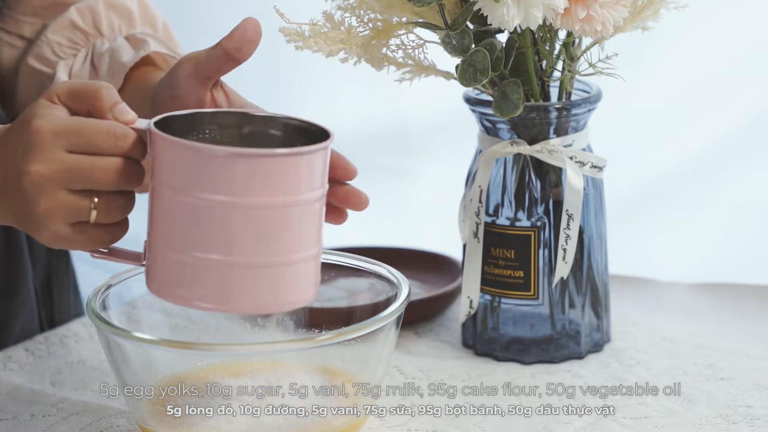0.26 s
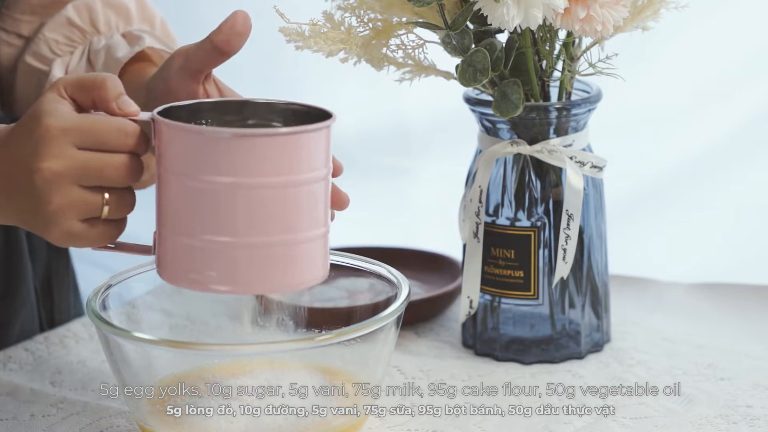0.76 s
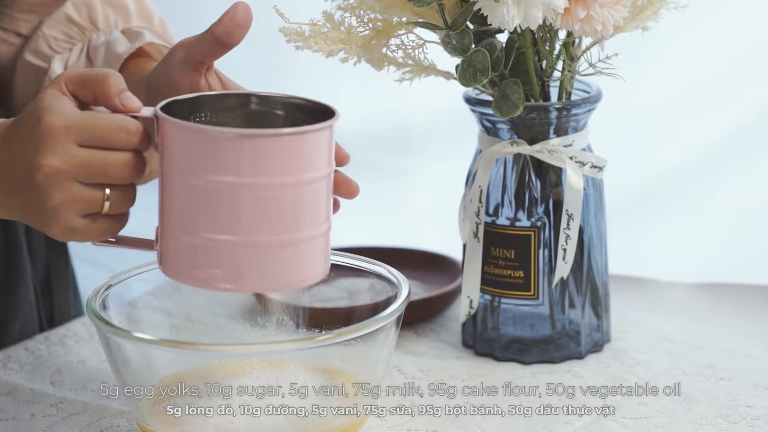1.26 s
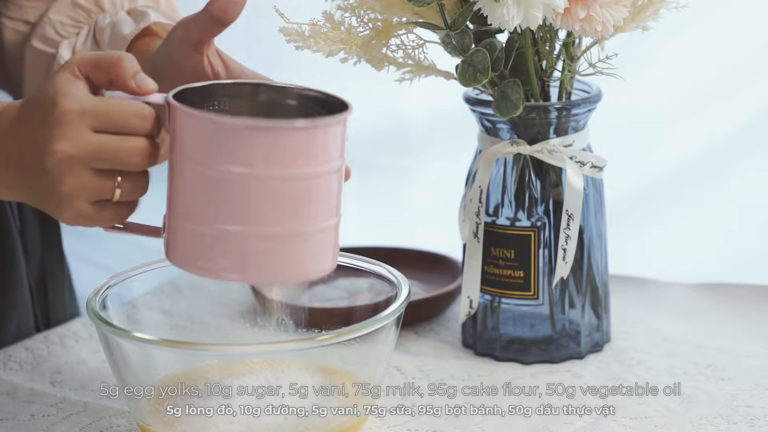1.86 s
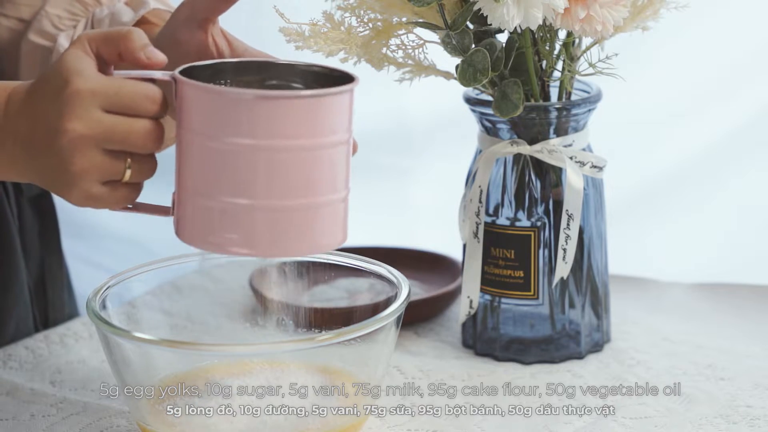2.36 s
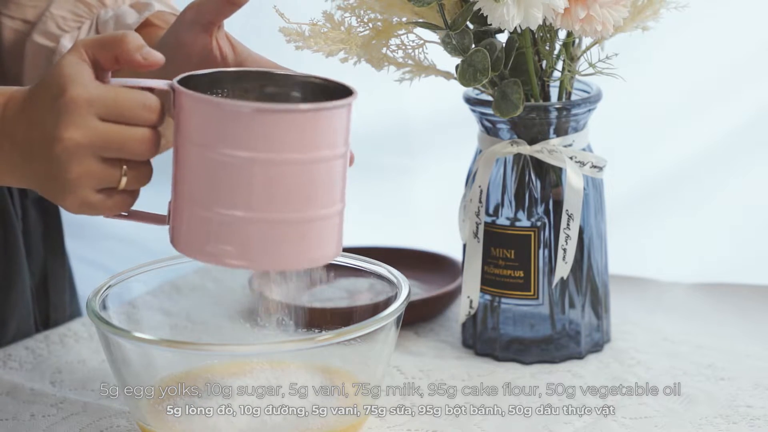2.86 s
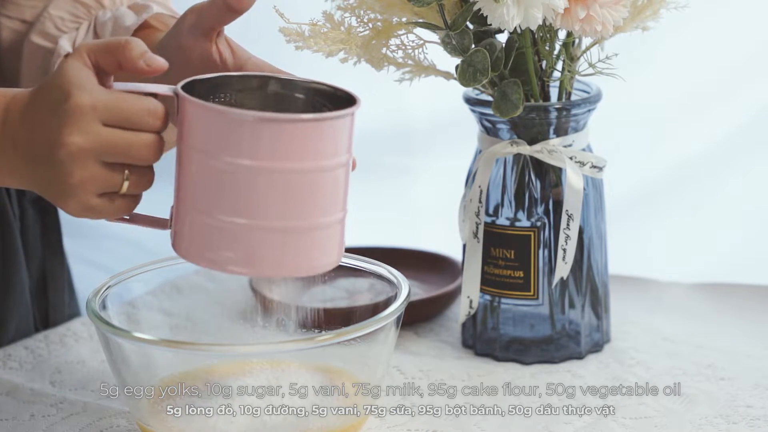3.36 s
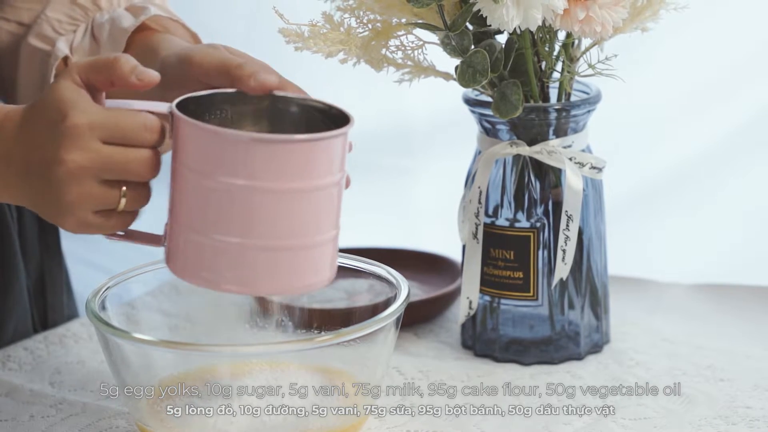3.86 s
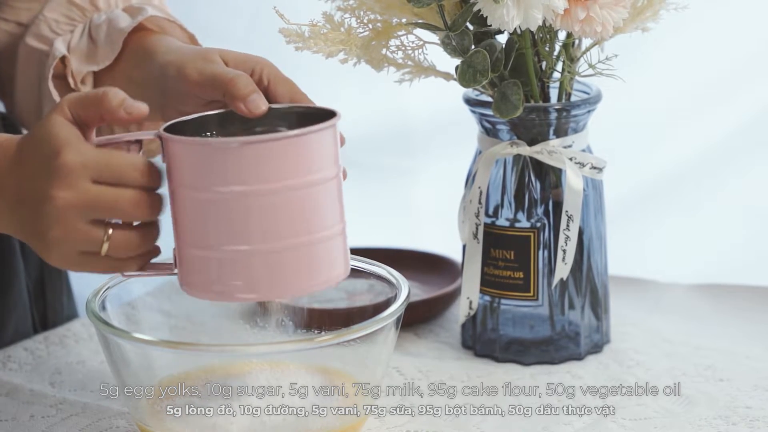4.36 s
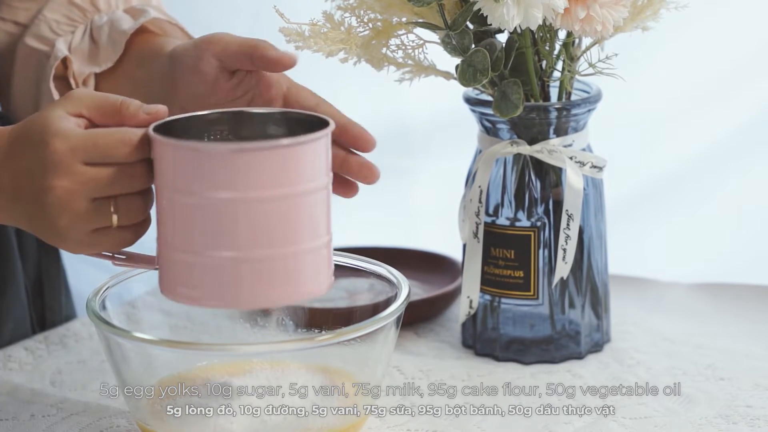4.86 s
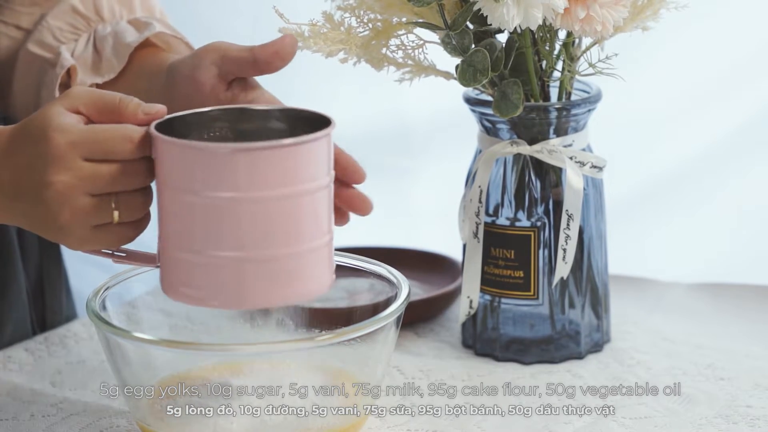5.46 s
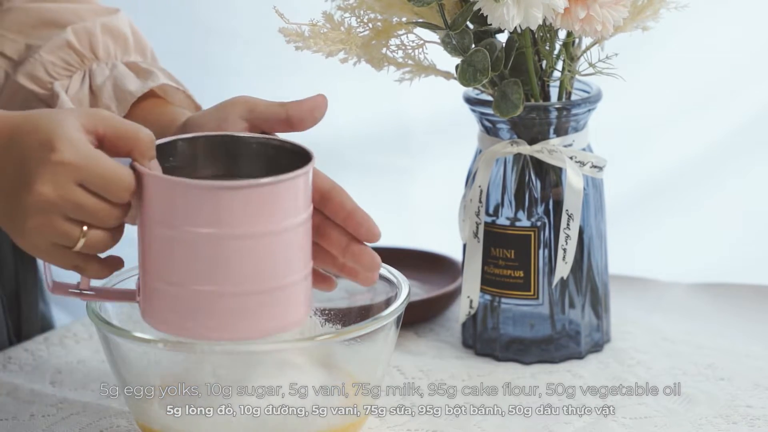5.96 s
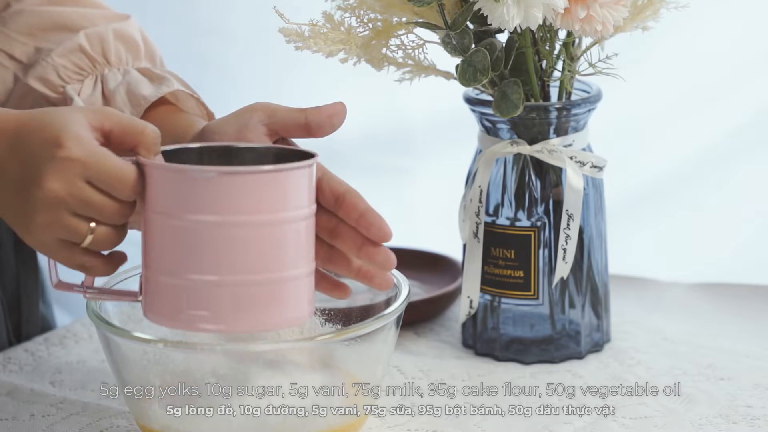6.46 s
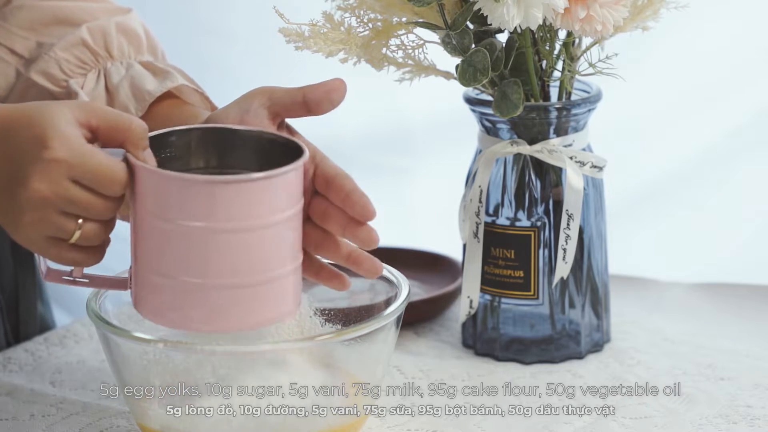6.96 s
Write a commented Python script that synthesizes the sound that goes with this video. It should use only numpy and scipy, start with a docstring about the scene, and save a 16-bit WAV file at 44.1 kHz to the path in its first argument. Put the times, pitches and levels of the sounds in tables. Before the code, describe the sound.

A metal flour sifter clicks and rasps in quick strokes, then is patted softly and clinks once against a glass bowl.

```python
"""A quiet kitchen, one microphone close to a squeeze-handle tin flour sifter.
A low hum wavers over soft hiss throughout, and a hand first shifts the can lightly. From 0.6 to 4.7 s each
stroke drags the wire agitator over the mesh: a gritty rub, sharp clicks that ring the can, and now and
then a faint ring from the handle spring. From 5 s the hand pats the can, which comes to rest tilted on
the palm. At 6.6 s its rim touches a glass bowl; two soft pats follow."""
import sys
import numpy as np
from scipy import signal
from scipy.fft import rfft, irfft, next_fast_len
from scipy.io import wavfile
from scipy.ndimage import map_coordinates

SR = 44100
rng = np.random.default_rng(int(sys.argv[2]) if len(sys.argv) > 2 else 0)


def waveform_to_disk(signal):
    """Save audio, clipped to [-1, 1], as 16-bit WAV at the path in sys.argv[1]."""
    frames = np.transpose(np.atleast_2d(signal))
    scaled = np.clip(frames, -1, 1) * 32767
    samples = np.round(scaled).astype(np.int16)
    wavfile.write(sys.argv[1], SR, samples)


N = 317520
EVENT_SAMPLES = 4096  # length of one pat, sweep or click


def amp(db):
    """Decibels to gain."""
    return 10 ** (np.asarray(db) / 20)


def unit_rms(x):
    """The signal scaled to rms 1."""
    return x / np.std(x)


def over_frequency(points, hz):
    """Rows of (frequency_hz, value), interpolated on a log axis."""
    point_hz, values = np.transpose(points)
    return np.interp(np.log(hz + 1), np.log(point_hz + 1), values)


def over_time(rows):
    """Rows of (time_s, value) as one value per sample."""
    return np.interp(np.arange(N) / SR, *np.transpose(rows))


def wobble(rate_hz, count=N):
    """A smooth random curve with rate_hz knots a second."""
    knots = rng.standard_normal(int(count * rate_hz / SR) + 4)
    return map_coordinates(knots, [np.arange(count) * rate_hz / SR])


def filtered(x, response):
    """The signal shaped by a gain that depends on frequency."""
    size = next_fast_len(N + SR // 2)
    return irfft(rfft(x, size) * response(np.fft.rfftfreq(size, 1 / SR)), size)[..., :N]


def resonate(force, modes):
    """A force rings modes (pitch_hz, width_hz, level_db), each at a fresh strength; scaled to peak 1."""
    pitch, width, level_db = np.transpose(modes)[:, :, None]
    hz = np.fft.rfftfreq(EVENT_SAMPLES, 1 / SR)
    polarity = (-1) ** np.arange(len(pitch))[:, None]
    gain = amp(level_db + rng.normal(0, 1.5, level_db.shape)) * polarity
    response = np.sum(gain * 1j * hz * width / (pitch ** 2 - hz ** 2 + 1j * hz * width), axis=0)
    ring = irfft(rfft(force, EVENT_SAMPLES) * response, EVENT_SAMPLES)
    return ring / np.abs(ring).max()


def band(force, pitch_hz, *widths_hz):
    """One resonance, applied once for each width; a second pass steepens its sides."""
    for width_hz in widths_hz:
        force = resonate(force, [(pitch_hz, width_hz, 0)])
    return force


# Spectrum of the kitchen's background: frequency_hz, relative_db
ROOM_SPECTRUM = [(22, -19), (38, -11), (60, -15), (95, -13.5), (180, -26), (553, -39), (1380, -48.5),
                 (5000, -59.5), (16000, -70)]
# Faint high rustle at the microphone: time_s, level_db
RUSTLE_LEVELS = [(0, -80), (4.4, -85), (4.8, -94), (5.96, -80.5), (6, -74), (6.6, -80), (6.65, -92.5)]
def room_tone():
    """Distant rumble and hiss, with low peaks from the room's standing waves, under a flickering rustle."""
    def room_response(hz):
        standing_db = 4.5 * np.exp(-(hz / 150) ** 4) * np.cos(2 * np.pi * (hz - 91) / 21)
        return amp(over_frequency(ROOM_SPECTRUM, hz) + standing_db) * (hz > 18)

    air = unit_rms(filtered(rng.standard_normal(N), room_response))
    rustle = unit_rms(filtered(rng.standard_normal(N), lambda hz: (hz / 12000) ** 0.31))
    return amp(-50 + 0.27 * wobble(1.4)) * air + amp(over_time(RUSTLE_LEVELS) + 1.8 * wobble(25)) * rustle


# Low hum in the room: time_s, level_db
HUM_LEVELS = [(0.0, -53), (0.06, -47.5), (0.74, -44.5), (0.84, -53), (1.1, -43.5), (1.2, -46.5), (4.4, -46),
              (4.49, -36), (4.57, -58), (4.71, -35), (4.82, -43.5), (6.0, -49.5), (6.11, -35),
              (6.34, -27.5), (6.4, -42), (6.48, -29.5), (6.58, -55), (6.78, -37.5), (6.85, -42),
              (6.94, -31.5), (7.0, -54.5), (7.06, -43.5), (7.2, -47.5)]
def room_hum():
    """A low hum that swells, fades and wanders in pitch."""
    pitch_hz = 50 + 3.2 * wobble(11)
    level_db = over_time(HUM_LEVELS) + 2.7 * wobble(8)
    return np.sqrt(2) * amp(level_db) * np.sin(2 * np.pi * np.cumsum(pitch_hz) / SR)


# Modes of the tin wall, also rung by sweeps and clicks: pitch_hz, width_hz, level_db
WALL_MODES = [(2010, 240, 3.5), (2290, 415, 5.5), (2980, 570, -0.5), (3142, 450, 4), (2975, 1210, 1.5)]
# The flour-filled can hanging free: pitch_hz, width_hz, level_db
FULL_CAN_MODES = [(195, 410, 0.5), (388, 25, 5.5)]
# The emptier can tilted against the palm: pitch_hz, width_hz, level_db
RESTING_CAN_MODES = [(800, 540, 6.5), (1390, 820, -1)]
# Pats and small shifts of the can, close up: start_s, level_db, centre_hz, thud_relative_db
HAND_PATS = [(0.0706, -48, 8350, -19), (0.144, -59.5, 6960, -15), (0.224, -53, 9800, 1),
             (0.367, -45, 7960, -21), (0.419, -53.5, 9100, 2), (5.0361, -42.5, 6400, 7),
             (5.234, -45, 7600, 11), (5.3545, -46.5, 6960, -7), (5.4306, -49, 7150, 15.5),
             (5.5632, -49, 7040, -3), (5.6358, -39, 6600, 11.5), (5.6733, -53.5, 5150, 12),
             (5.8038, -47.5, 5460, 0), (5.828, -41, 6900, -8.5), (5.945, -46.5, 7360, -2.5),
             (5.9881, -53, 5240, 5.5), (6.0797, -42.5, 9300, -21), (6.183, -43, 4230, -4.5),
             (6.2925, -43, 8200, -21), (6.3841, -40.5, 4770, -7.5), (6.493, -43.5, 7200, -20),
             (6.597, -52.5, 3480, -15), (6.9846, -48, 4400, -13.5), (7.1159, -55, 4700, -7.5)]
def hand_pats(rests_from_s=6.03, push_lead_s=0.003):
    """The palm pushes first; then skin snaps on tin, the wall rattles and flour shakes on the mesh."""
    out, t = np.zeros(N + EVENT_SAMPLES), np.arange(EVENT_SAMPLES) / SR
    since_touch = np.clip(t - push_lead_s, 0, 1)
    touch = 1 - np.exp(-since_touch / 0.000083)
    push = -np.exp(-((t - 0.0021) / 0.00045) ** 2)
    for start_s, level_db, centre_hz, thud_db in HAND_PATS:
        if start_s < rests_from_s:
            flour_db, wall_db, body_modes = -9, -20, FULL_CAN_MODES
        else:
            flour_db, wall_db, body_modes = -15.5, -12, RESTING_CAN_MODES
        skin = rng.standard_normal(EVENT_SAMPLES) * amp(-60 * since_touch / 0.022) * touch
        snap = band(skin, centre_hz, 9000) + amp(wall_db) * band(skin, 2400, 230)
        shake = rng.standard_normal(EVENT_SAMPLES) * amp(-60 * since_touch / 0.16) * touch * (t < 0.085)
        flour = amp(flour_db) * band(shake, centre_hz, 5000, 5000)
        thud = resonate(push + 0.27 * shake, body_modes)
        rattle = amp(-18) * resonate(shake + 2 * skin, WALL_MODES[2:])
        pat = snap + flour + amp(thud_db) * (thud + rattle)
        out[round((start_s - push_lead_s) * SR):][:EVENT_SAMPLES] += amp(level_db) * pat
    return out[:N]


# Modes of the wires and mesh, also rung by clicks: pitch_hz, width_hz, level_db
WIRE_MODES = [(4675, 2140, -2.5), (5430, 1700, 3.5), (6520, 700, 4), (7490, 710, 0.5), (8260, 640, 1.5),
              (9750, 1700, 0), (11320, 1540, -1), (14040, 4400, -12.5)]
# Agitator sweeps, close up: start_s, grit_db, cavity_db, cavity_hz
SWEEPS = [(0.556, -63.5, -69, 770), (0.593, -45, -64, 666), (0.709, -53.5, -62.5, 780),
          (0.801, -60.5, -67, 730), (0.951, -55.5, -63, 710), (1.023, -52.5, -60, 710),
          (1.16, -55, -58.5, 740), (1.235, -49.5, -53, 746), (1.369, -57, -56.5, 766),
          (1.462, -54.5, -59.5, 800), (1.594, -61, -50.5, 760), (1.703, -56, -55.5, 774),
          (1.824, -63.5, -60, 780), (1.951, -54.5, -59, 766), (2.09, -54.5, -58, 794),
          (2.185, -54, -51, 750), (2.324, -58.5, -65, 774), (2.412, -51, -53, 760), (2.55, -57, -58, 740),
          (2.648, -49, -54, 578), (2.79, -57.5, -59, 656), (2.881, -54, -61, 670),
          (3.014, -57.5, -56.5, 747), (3.116, -61, -56.5, 773), (3.252, -58.5, -59.5, 665),
          (3.357, -47, -53, 790), (3.486, -60.5, -57.5, 767), (3.544, -52, -48, 735),
          (3.668, -58.5, -56.5, 750), (3.759, -48, -55.5, 637), (3.871, -57, -59, 764),
          (3.959, -48.5, -51.5, 727), (4.08, -59, -58, 780), (4.201, -51, -51.5, 698),
          (4.32, -60.5, -53, 810), (4.546, -62.5, -61.5, 790), (4.639, -59.5, -61.5, 760)]
def agitator_sweeps(gentle_s=0.03, gentle_db=-56.5, shorter_s_per_db=0.002):
    """Grit under the wires excites mesh, wall and the air in the can; a brisk sweep is loud and short."""
    out, t = np.zeros(N + EVENT_SAMPLES), np.arange(EVENT_SAMPLES) / SR
    moving = t < gentle_s + 0.01
    for start_s, grit_db, cavity_db, cavity_hz in SWEEPS:
        length_s = gentle_s - shorter_s_per_db * max(grit_db - gentle_db, 0)
        release = amp(-60 * np.clip(t - length_s, 0, 1) / 0.095) * (t < 0.09)
        envelope = np.clip(t / 0.0071, 0, 1) * release
        grains = rng.standard_normal(EVENT_SAMPLES) * envelope
        grains *= amp(3 * wobble(500, EVENT_SAMPLES) + 4.5 * wobble(180, EVENT_SAMPLES))
        lumps = rng.standard_normal(EVENT_SAMPLES) * amp(3.5 * wobble(110, EVENT_SAMPLES)) * envelope
        grit = resonate(grains, WIRE_MODES) + amp(-7.5) * resonate(grains, WALL_MODES + [(1350, 500, -10)])
        hollow = band(lumps, cavity_hz, 130, 170)
        sweep = amp(grit_db) * grit / grit[moving].std() + amp(cavity_db) * hollow / hollow[moving].std()
        out[round(start_s * SR):][:EVENT_SAMPLES] += sweep
    return out[:N]


# Decay of the kitchen around the microphone: frequency_hz, t60_s
KITCHEN_DECAY = [(500, 0.61), (3000, 0.31), (7000, 0.34), (15000, 0.18)]
def kitchen_reverb(x, delay_samples=150):
    """The room's reflections, drawn afresh for each tenth of a second as the can moves."""
    out, step = np.zeros(N + SR), SR // 10
    for start in range(0, N, step):
        hz, t, spectrum = signal.stft(rng.standard_normal(SR // 3), SR, nperseg=256)
        decay = amp(-60 * t / over_frequency(KITCHEN_DECAY, hz)[:, None])
        tail = signal.istft(spectrum * decay, SR, nperseg=256)[1]
        reflections = signal.fftconvolve(x[start:start + step], tail / np.linalg.norm(tail))
        out[start + delay_samples:][:len(reflections)] += reflections
    return out[:N]


# Wires and spring snapping against the tin, close up: start_s, level_db, brightest_hz, wall_relative_db
WIRE_CLICKS = [(0.5975, -25.5, 4740, -1), (0.609, -33, 6000, 3.5), (0.713, -46, 8000, -27),
               (0.808, -34.5, 5600, -22), (0.8411, -33.5, 5480, -13.5), (0.962, -33, 8240, -7),
               (0.9764, -29.5, 9950, -17), (1.029, -48, 8660, -10.5), (1.037, -41, 7500, -10),
               (1.0594, -26.5, 6700, -16), (1.165, -34.5, 8040, -16), (1.178, -38.5, 6500, -7),
               (1.188, -34, 9060, -12.5), (1.237, -35.5, 8040, -8), (1.2515, -25, 8150, -8),
               (1.261, -19, 6210, -15), (1.3808, -28, 9200, -24.5), (1.396, -34, 9100, -9.5),
               (1.476, -39, 8100, -7), (1.4912, -22, 6100, -20), (1.6027, -30.5, 7800, -12),
               (1.707, -42, 8200, -5.5), (1.7147, -36, 7540, -1.5), (1.739, -33.5, 6500, -13),
               (1.8485, -34.5, 10000, -32), (1.9583, -32.5, 9970, -19), (1.968, -35.5, 5750, -7.5),
               (1.9976, -26, 6300, -14.5), (2.189, -35.5, 8100, 0), (2.1973, -30, 6920, -3),
               (2.2169, -32.5, 6430, -16), (2.3376, -34, 9200, -13), (2.427, -29, 7900, -4.5),
               (2.4431, -26, 6550, -34), (2.6511, -31, 9240, -30), (2.658, -33.5, 8500, -8),
               (2.681, -37.5, 5570, -2.5), (2.7998, -34, 10620, -9), (2.889, -38, 8100, -4),
               (2.9118, -26.5, 6480, -27), (3.023, -33.5, 7460, -26), (3.1257, -37.5, 7500, 0),
               (3.1546, -39, 6400, -18), (3.259, -36.5, 7380, -12), (3.361, -38, 8230, -9.5),
               (3.371, -32, 6600, -6), (3.387, -39.5, 6240, -30), (3.505, -38, 8480, -11),
               (3.551, -25.5, 8480, -5), (3.5667, -23.5, 5120, -3), (3.7654, -33, 8340, -13.5),
               (3.774, -41.5, 6600, -4), (3.786, -28.5, 6060, -10), (3.8752, -37, 8030, -15),
               (3.966, -26.5, 8240, -13.5), (3.983, -13.5, 6600, -20), (4.208, -28.5, 9210, -10.5),
               (4.229, -18.5, 6380, -21), (4.322, -39, 7450, -22), (4.5502, -28.5, 10020, -45),
               (4.5728, -38.5, 7650, -11), (4.677, -30.5, 7610, -30)]
def wire_clicks():
    """A brief rough push rings wires and can, the wires most near brightest_hz; mesh and flour rasp on."""
    out, t = np.zeros(N + EVENT_SAMPLES), np.arange(EVENT_SAMPLES) / SR
    shiver_gate = np.clip((0.09 - t) / 0.045, 0, 1) * (t > 0.002)
    for start_s, level_db, brightest_hz, wall_db in WIRE_CLICKS:
        force = rng.standard_normal(EVENT_SAMPLES) * amp(-60 * t / 0.0081) * (1 - np.exp(-t / 0.00022))
        shiver = rng.standard_normal(EVENT_SAMPLES) * amp(-60 * t / 0.19) * shiver_gate
        wire_modes = [(hz * rng.normal(1, 0.02), width_hz, db - 14 * abs(np.log2(hz / brightest_hz)))
                      for hz, width_hz, db in WIRE_MODES]
        knock = amp(-13) * band(force, 750, 370, 350)
        crack = amp(-10.5) * band(force, brightest_hz, 7000) + amp(-24.5) * band(force, 1440, 560)
        rasp = amp(-25.5) * band(shiver, brightest_hz, 7000, 7000)
        tin = resonate(force + 0.082 * shiver, WALL_MODES) + knock
        click = resonate(force, wire_modes) + crack + rasp + amp(wall_db) * tin
        out[round(start_s * SR):][:EVENT_SAMPLES] += amp(level_db) * click
    return out[:N]


# Twangs of the handle spring, faint even this close: start_s, level_db
SPRING_TWANGS = [(1.615, -69), (1.74, -75), (2.915, -70), (3.13, -71)]
def handle_spring(pitch_hz=2980, partner_hz=3460, partner_db=-6, t60_s=0.6):
    """The spring is left ringing in two thin tones that flutter as they die."""
    t = np.arange(N) / SR
    envelope = sum(amp(level_db - 60 * np.abs(t - start_s) / t60_s) * (t > start_s)
                   for start_s, level_db in SPRING_TWANGS)
    tones = [(pitch_hz, 0), (partner_hz, partner_db)]
    return envelope * sum(amp(db + 5 * wobble(40)) * np.sin(2 * np.pi * hz * t) for hz, db in tones)


# Modes of the glass bowl beside the sifter: pitch_hz, relative_db, t60_s
BOWL_MODES = [(614, -12.5, 0.24), (1502, -19.5, 0.35), (2670, -10, 0.2), (4180, -9, 0.068),
              (4135, -38, 0.78), (5910, -18, 0.14), (8040, -23, 0.14), (10260, -19.5, 0.11)]
def bowl_clink(start_s=6.6322, level_db=-37):
    """The can's rim touches the bowl once: a tick of contact, and the glass rings."""
    t = np.clip(np.arange(N) / SR - start_s, 0, None)
    ring = sum(amp(db - 60 * t / t60_s) * np.sin(2 * np.pi * hz * t) for hz, db, t60_s in BOWL_MODES)
    dull_noise = signal.lfilter([1], [1, -0.6], rng.standard_normal(N))
    tick = amp(-60 * t / 0.0333) * dull_noise * (t > 0)
    return amp(level_db) * (ring + 0.19 * tick)


def scene():
    """Mono, from beside the sifter: direct sound leads, and only sweeps and clicks carry reverberation."""
    sifter = agitator_sweeps() + wire_clicks()
    reflections = amp(-13) * kitchen_reverb(sifter)
    foreground = sifter + handle_spring() + hand_pats() + bowl_clink()
    return (foreground + reflections + room_hum() + room_tone())[None]


def record(dry):
    """The camera's microphone channel keeps nothing above 16.3 kHz."""
    return filtered(dry, lambda hz: hz < 16300)


dry = scene()
out = record(dry)
waveform_to_disk(out)
```